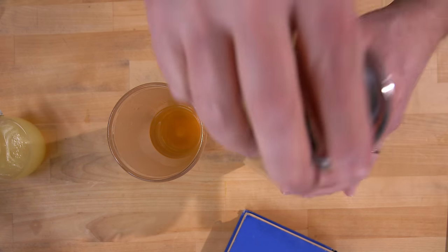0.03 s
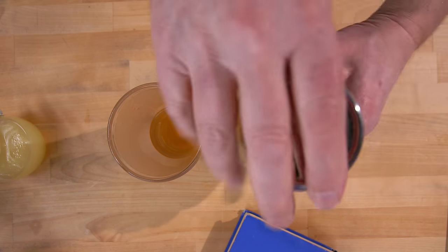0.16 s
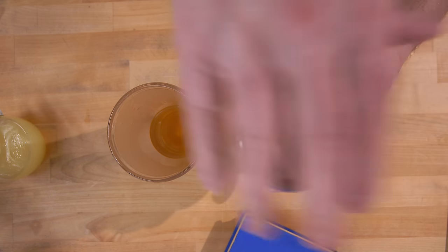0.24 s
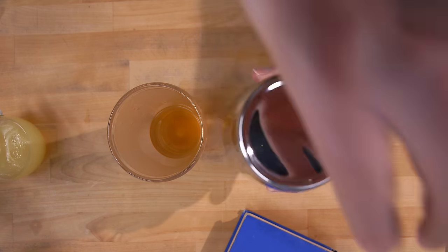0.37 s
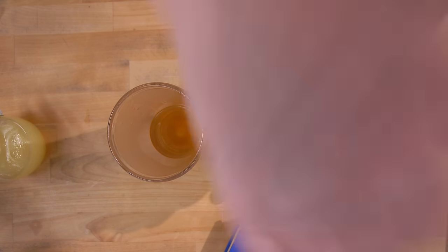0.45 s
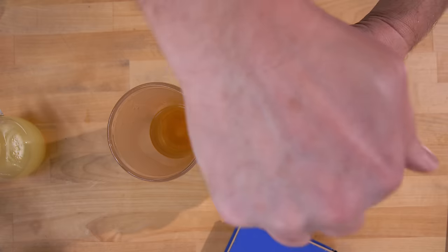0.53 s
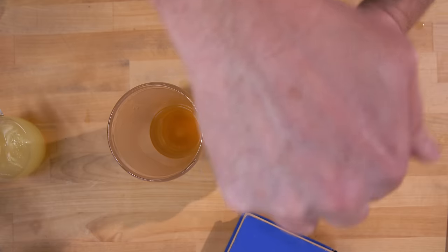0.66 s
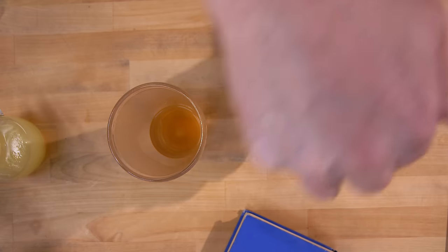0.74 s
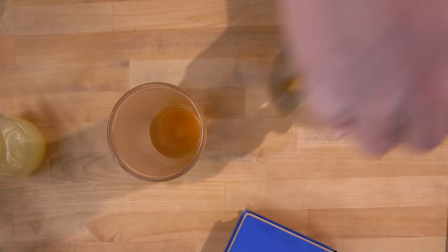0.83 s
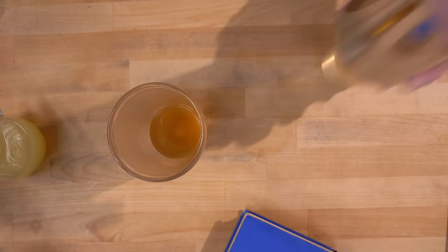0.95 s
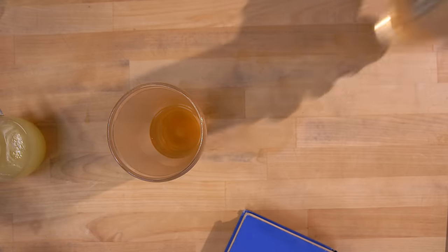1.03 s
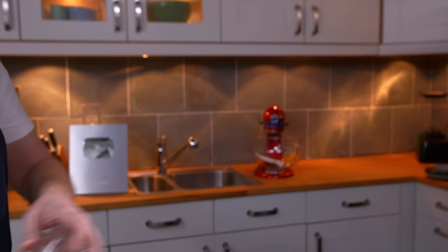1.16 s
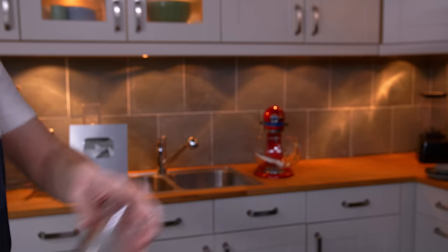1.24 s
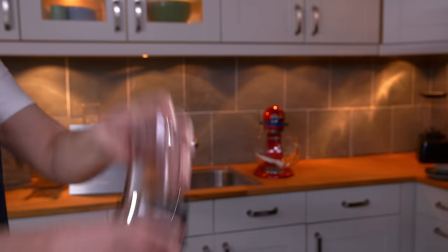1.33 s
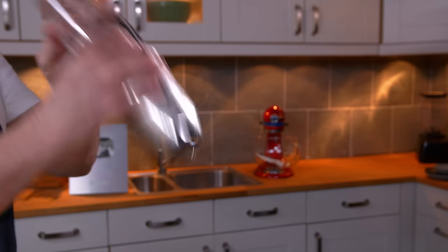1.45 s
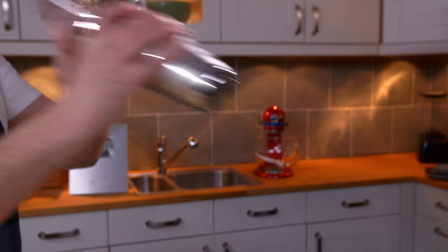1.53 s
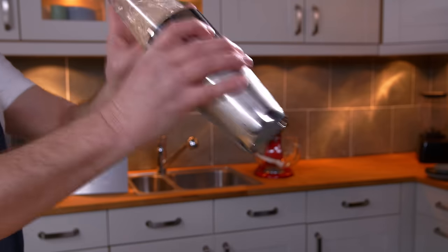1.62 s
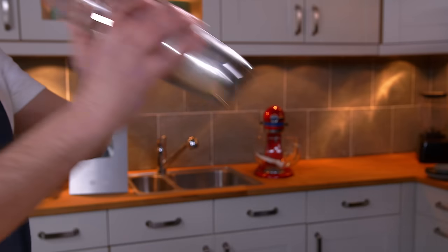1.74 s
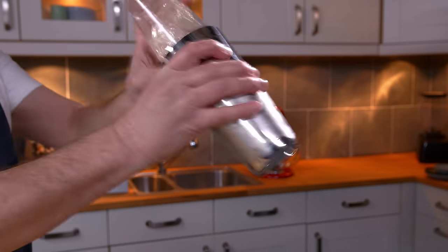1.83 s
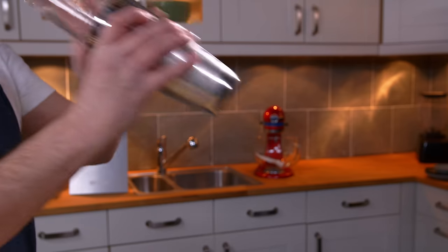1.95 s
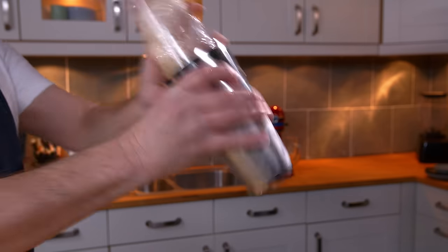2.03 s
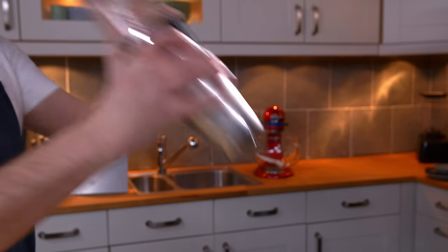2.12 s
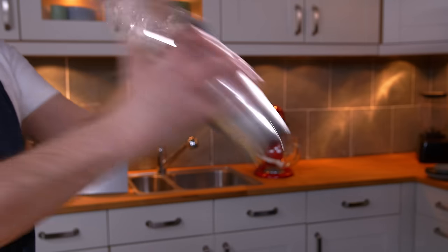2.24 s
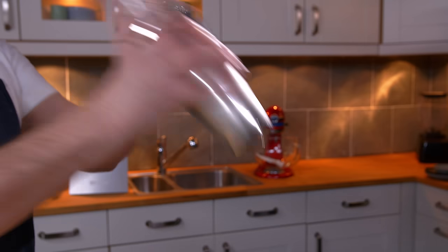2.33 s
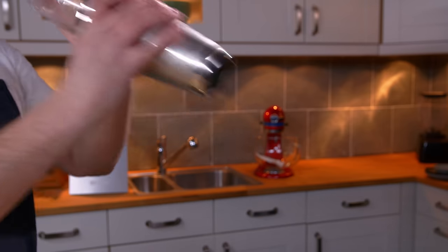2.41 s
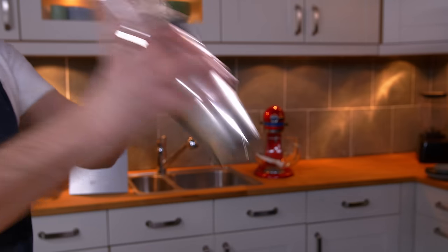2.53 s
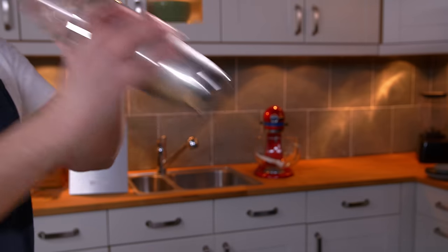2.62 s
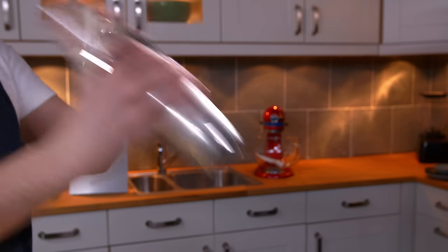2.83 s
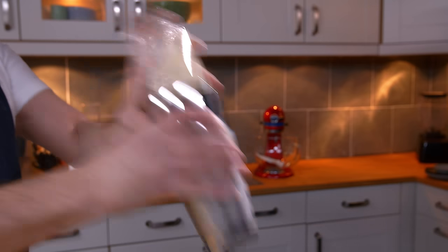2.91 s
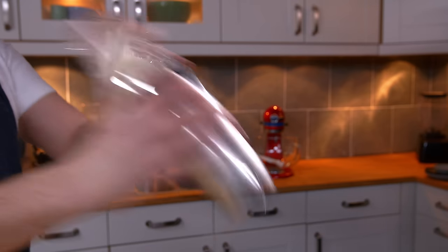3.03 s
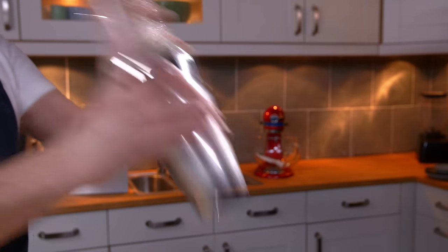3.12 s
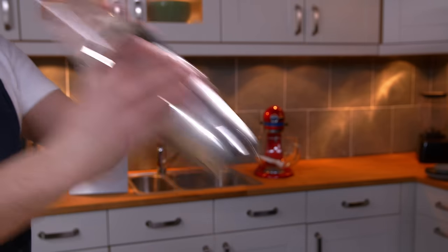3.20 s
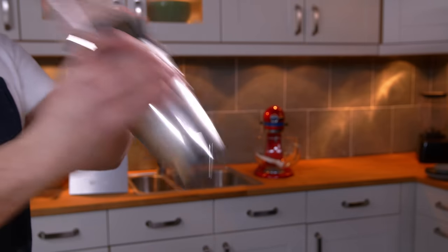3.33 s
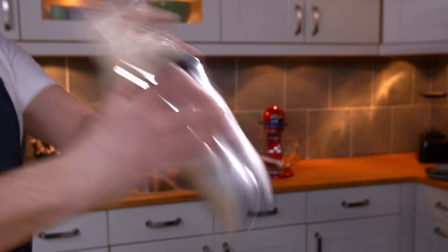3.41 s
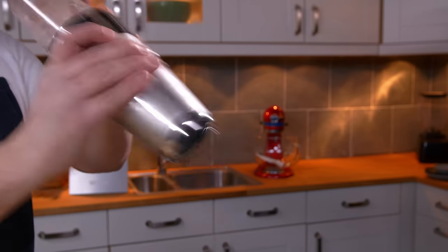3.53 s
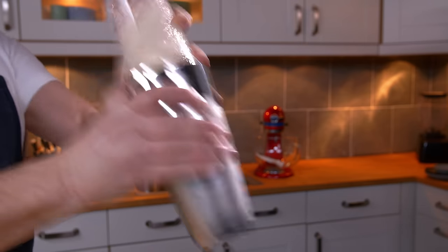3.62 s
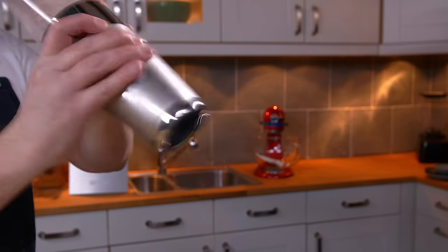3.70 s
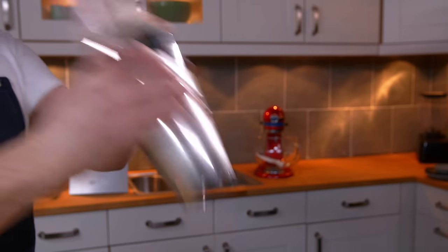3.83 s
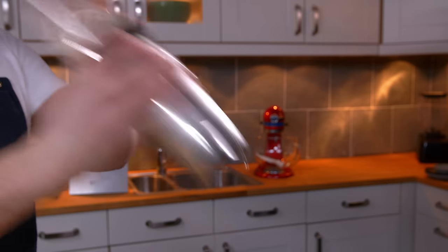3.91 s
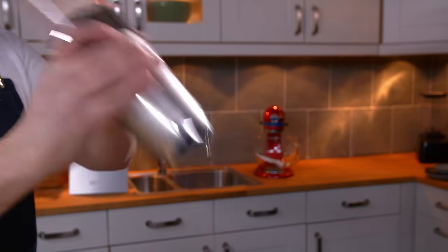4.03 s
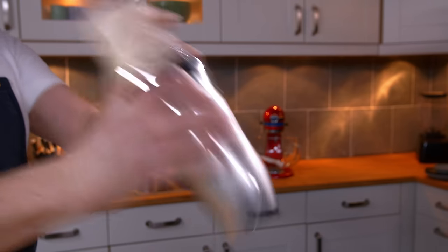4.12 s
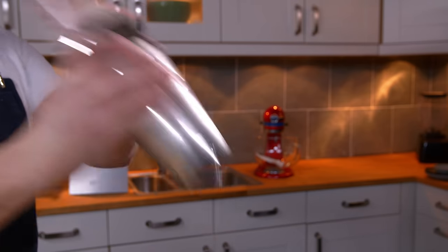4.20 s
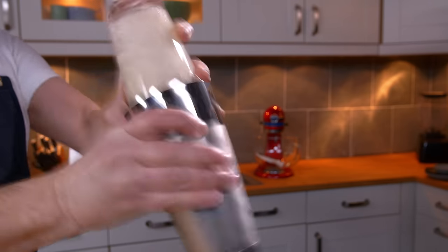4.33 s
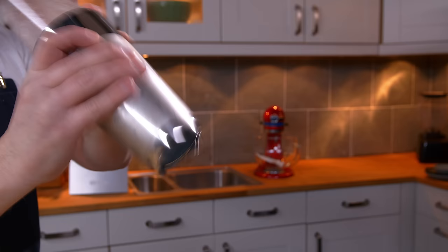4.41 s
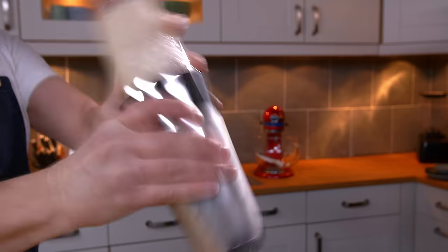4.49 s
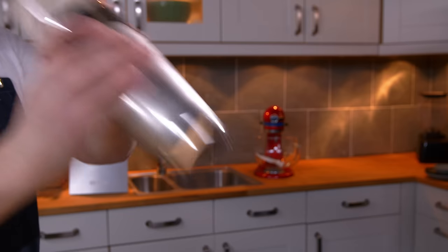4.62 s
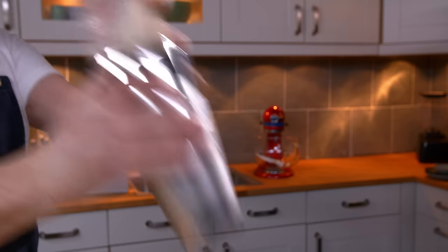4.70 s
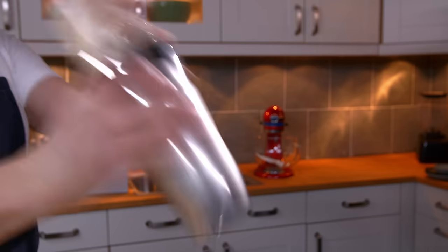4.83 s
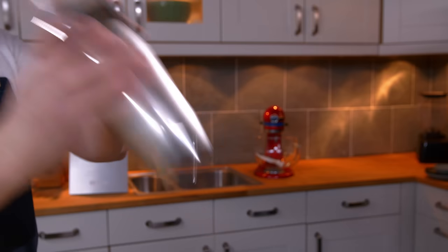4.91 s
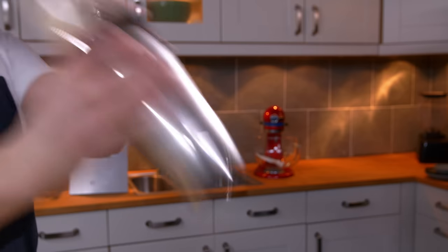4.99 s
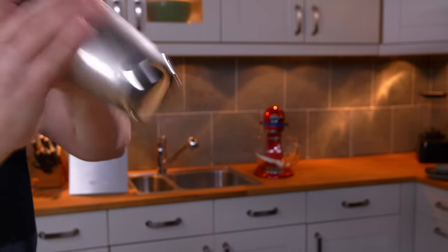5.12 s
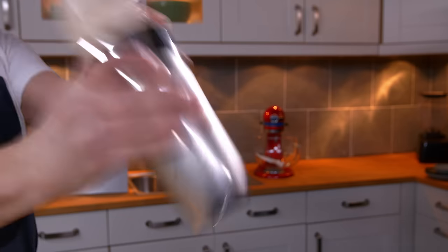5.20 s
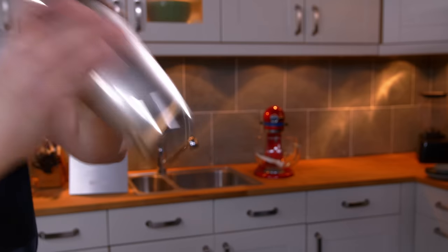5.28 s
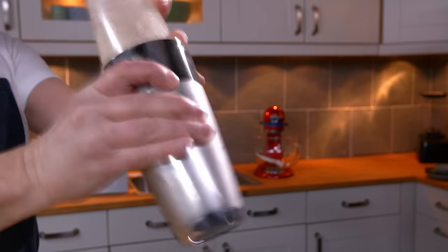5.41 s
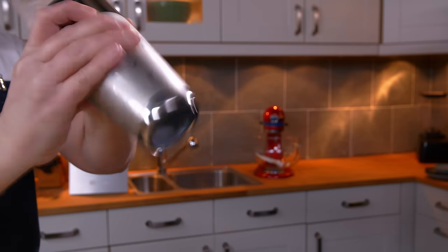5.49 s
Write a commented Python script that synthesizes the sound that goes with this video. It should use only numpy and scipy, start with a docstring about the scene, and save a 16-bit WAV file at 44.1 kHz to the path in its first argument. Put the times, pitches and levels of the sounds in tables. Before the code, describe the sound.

After a short thud and clink on a wooden counter, ice and drink are shaken vigorously in a steel shaker, clattering and splashing.

```python
"""A kitchen, at a wooden counter. A glass is pressed and slapped into a steel shaker can: the counter
thuds, the glass rings, ice clatters. The can is lifted; the counter rumbles on, ice settles and a thin
tone swells and fades. After a brief silence comes a second scene, the shaking: cubes knock the wall
and base of the hand-damped can, small pieces rattle, and the drink splashes and sloshes."""
import sys
import numpy as np
from scipy import signal
from scipy.fft import rfft, irfft, next_fast_len
from scipy.io import wavfile

SR = 44100
rng = np.random.default_rng(int(sys.argv[2]) if len(sys.argv) > 2 else 0)


def file_out(sig):
    """Save sig as 16-bit WAV at sys.argv[1]."""
    # one column per channel
    cols = np.atleast_2d(sig).T
    # limit, then scale
    lim = np.clip(cols, -1, 1)
    pcm = np.round(lim * 32767).astype(np.int16)
    wavfile.write(sys.argv[1], SR, pcm)


N = 244755
PAUSE_START_S, PAUSE_END_S = 1.158, 1.193


def gain_of(db):
    return 10 ** (np.asarray(db) / 20)


def unit_rms(x):
    return x / np.sqrt(np.mean(x ** 2) + 1e-20)


def unit_peak(x):
    return x / (abs(x).max() + 1e-12)


def at_hz(points, hz):
    f, value = np.transpose(points)
    return np.interp(np.log(hz + 1), np.log(f + 1), value)


def curves(segments):
    """Gate over the table's time span, then each column per sample."""
    s, *columns = np.transpose(sorted(sum(segments, []), key=lambda row: row[0]))
    t = np.arange(N) / SR
    gate = np.clip(np.minimum(t - s[0], s[-1] - t) / 0.0066, 0, 1)
    return gate, *(np.interp(t, s, c) for c in columns)


def add(mix, start_s, sound):
    part = mix[round(start_s * SR):][:len(sound)]
    part += sound[:len(part)]


def coloured(x, spectrum):
    """Spectral shaping, rms 1."""
    size = next_fast_len(len(x))
    gain = gain_of(at_hz(spectrum, np.fft.rfftfreq(size, 1 / SR)))
    return unit_rms(irfft(rfft(x, size) * gain, size)[:len(x)])


def resonate(x, hz, *widths_hz):
    """Unity-gain resonators in series, one per width."""
    for width_hz in widths_hz:
        r = np.exp(-np.pi * width_hz / SR)
        x = 2 * signal.lfilter([1 - r], [1, -r * np.exp(2j * np.pi * hz / SR)], x).real
    return x


def swell(rise_s, count):
    """Fast rise to 1, slower fall."""
    u = np.arange(count) / SR / max(rise_s, 1e-4)
    return u * np.exp(1 - u)


def decay(t60_s, count):
    return gain_of(-60 * np.arange(count) / SR / t60_s)


def flicker(step_s, spread_db):
    """Randomly wandering gain."""
    steps = rng.standard_normal(int(N / SR / step_s) + 2)
    return gain_of(spread_db * np.interp(np.arange(N) / SR / step_s, np.arange(len(steps)), steps))


def struck(modes, push):
    """Modes rung by one push; the spot hit sets each one's strength and sign."""
    t = np.arange(SR // 2) / SR
    spots = rng.uniform(-1.07, 1, (len(modes), 2))
    ring = sum(np.sign(side) * gain_of(db + 2 * strength - 60 * t / t60_s) * np.sin(2 * np.pi * hz * t)
               for (hz, db, t60_s), (strength, side) in zip(modes, spots))
    return unit_peak(signal.fftconvolve(ring, push)[:len(t)])


# Room noise: (frequency [Hz], relative density [dB])
ROOM_SPECTRUM = [(18, -34), (30, -4), (59, -18.5), (86, -36.5), (149, 4.5), (174, 4), (319, 3), (666, -8.5),
                 (2540, -14), (4080, -17.5), (16000, -27)]


def room_tone(level_db=-72.5):
    """Faint, steady, low noise."""
    return gain_of(level_db) * coloured(rng.standard_normal(N), ROOM_SPECTRUM)


# Kitchen decay: (frequency [Hz], t60 [s])
KITCHEN_T60 = [(150, 0.35), (1000, 0.084), (4000, 0.12), (12000, 0.14)]


def kitchen_reverb(x):
    """Sparse reflections of random sign; each band decays at its own rate."""
    taps = np.zeros(SR // 2)
    slots = np.arange(200, SR // 2 - 20, 20)
    taps[slots + rng.integers(0, 20, len(slots))] = rng.choice([-1., 1.], len(slots))
    hz, t, bands = signal.stft(taps, SR, nperseg=256)
    tail = signal.istft(bands * gain_of(-60 * t / at_hz(KITCHEN_T60, hz)[:, None]), SR, nperseg=256)[1]
    return signal.fftconvolve(x, tail / np.linalg.norm(tail))[:N]


# Tone contour: (time [s], pitch [Hz], level [dB])
TONE_CONTOUR = [(0.6, 1752, -63), (0.632, 1750, -68), (0.684, 1750, -63), (0.78, 1751, -66),
                (0.906, 1747, -85), (0.92, 1749, -101)]
# Tone partials: (pitch [ratio], gain [dB])
TONE_PARTIALS = [(1, 0), (1.185, -13), (1.221, -13), (1.532, -11)]


def thin_tone(onset_s=0.053):
    """A thin tone swells and fades with three fainter ones above it."""
    gate, hz, level_db = curves([TONE_CONTOUR])
    cycles = np.cumsum(hz) / SR
    gate *= np.minimum(np.cumsum(gate) / SR / onset_s, 1)
    partials = sum(gain_of(db) * flicker(.02, 1.7) * np.sin(2 * np.pi * ratio * cycles)
                   for ratio, db in TONE_PARTIALS)
    return gate * np.sqrt(2) * gain_of(level_db) * partials


# Ice ticks: (time [s], peak [dB], pitch [Hz])
ICE_TICKS = [(0.1994, -59, 2420), (0.2464, -66, 2820), (0.2724, -61, 2510), (0.2894, -65, 2480),
             (0.6394, -57, 2670), (0.6714, -64, 2140), (0.748, -55, 2580), (0.7927, -51, 2630),
             (0.807, -56, 2500), (0.8374, -58, 2480), (0.8649, -59.5, 3040), (0.8974, -67, 3250),
             (0.9293, -54.5, 2940), (0.9634, -63, 6900), (0.9744, -63, 4710), (1.02, -65, 3070),
             (1.0654, -62, 2930)]


def settling_ice():
    """Ice settles in the lifted can with small pitched snaps."""
    out = np.zeros(N)
    for s, peak_db, hz in ICE_TICKS:
        snap = swell(0.0011, count=800) * rng.standard_normal(800)
        add(out, s, gain_of(peak_db) * (unit_peak(resonate(snap, hz, 350)) + 0.079 * snap))
    return out


# Counter rumble, in segments: (time [s], relative level [dB], centre [Hz])
RUMBLE_CONTOUR = [
    [(0.54, -28.5, 169), (0.596, -41, 204), (0.636, -47, 176), (0.66, -53, 165), (0.674, -53, 167),
     (0.766, -55, 196), (0.78, -58, 189)],
    [(0.78, -56, 176), (0.824, -58, 189), (0.862, -61.5, 262), (0.91, -62.5, 258), (0.958, -76, 220),
     (0.97, -65.5, 208), (1.0, -80, 228)],
]
# Wooden counter: (frequency [Hz], gain [dB], nominal t60 [s])
COUNTER_MODES = [(63, -12, .4), (98, -5.5, .15), (127, 0.5, .2), (156.4, -7, 0.28), (217, -1.5, 0.12),
                 (267, -11, 0.1), (288.5, 2.5, 0.11), (327, -7.5, 0.083), (367, -8.5, 0.091), (426, 5, .08),
                 (533, -5, 0.19), (610, 0, 0.079), (743, 1, 0.066), (860, 5, 0.066), (1023, 0.5, .07),
                 (1240, -14, .07)]


def counter_modes(centre_hz, slope_db_per_octave=14.2):
    """Counter modes near the excited pitch ring most."""
    return [(hz, db - slope_db_per_octave * abs(np.log2(hz / centre_hz)), t60_s)
            for hz, db, t60_s in COUNTER_MODES]


def counter_rumble():
    """The counter's lower modes rumble on while the can is lifted."""
    gate, level_db, centre_hz = curves(RUMBLE_CONTOUR)
    noise = rng.standard_normal(N)
    rumble = sum(gain_of(db) * unit_rms(resonate(noise, hz, 30))
                 for hz, db, _ in counter_modes(centre_hz)[:12])
    return gate * gain_of(level_db - 7.5) * rumble


# Glass: (frequency [Hz], gain [dB], undamped t60 [s])
GLASS_MODES = [(1497, -12, .06), (1846, -10, .05), (2293, -12, .04), (2580, -15, .1), (2720, -16, .12),
               (2955, 0, .13), (3020, -6, .11), (4010, -14, .07), (4538, -2, .12), (4610, -8, .08),
               (5378, -10, .05), (7235, -16, .06)]
# Clatter: (frequency [Hz], relative density [dB])
CLATTER_SPECTRUM = [(300, -11.5), (1000, -1.5), (2700, -4), (5000, -8), (9000, -11.5), (16000, -18.5)]
# Blows: (time [s], thud [dB], spot pitch [Hz], glass ring [dB], hand damping [t60 factor],
# relative clatter [dB], contact [s])
CLOSING_BLOWS = [(.0045, -32, 300, -26, 0.88, -20, .002), (0.091, -48, 300, -52, 0.27, -41, .003),
                 (0.097, -48, 300, -30, 0.34, -34, .002), (0.104, -49, 150, -49, 0.48, -34, .002),
                 (0.1105, -44, 150, -33, 0.17, -34, .0015), (0.119, -34.5, 283, -53, 0.41, -46, .0015),
                 (0.17, -51.5, 150, -52, .4, -54, .003), (0.504, -15, 718, -40, .3, -18.5, .0015),
                 (0.513, -17.5, 170, -45.5, .3, -31, .003), (.523, -24, 600, -33.5, .3, -38, .002),
                 (0.53, -23, 500, -45, .3, -37, .003), (0.542, -27, 600, -45, 0.27, -54, .004),
                 (0.57, -40, 500, -48, .3, -55, .005), (0.587, -42, 202, -41, 0.27, -50, .003),
                 (0.615, -53, 200, -50, .3, -68, .004)]


def closing_blows():
    """Each blow thuds in the counter, rings the glass and clatters briefly."""
    out = np.zeros(N)
    noise = coloured(rng.standard_normal(N), CLATTER_SPECTRUM)
    push = np.diff(swell(0.00021, count=400))
    loose_ice = 0.046 * decay(0.27, count=6000)
    for s, thud_db, spot_hz, ring_db, damping, clatter_db, contact_s in CLOSING_BLOWS:
        counter = [(hz, db, t60_s * (0.18 + .6 * damping)) for hz, db, t60_s in counter_modes(spot_hz)]
        glass = [(hz, db, t60_s * damping) for hz, db, t60_s in GLASS_MODES]
        clatter = (swell(contact_s, count=6000) + loose_ice) * noise[round(s * SR):][:6000]
        add(out, s, gain_of(thud_db) * struck(counter, push))
        add(out, s, gain_of(ring_db) * struck(glass, np.ones(1)))
        add(out, s, gain_of(clatter_db - 7.5) * clatter)
    return out


# Slosh: (frequency [Hz], relative density [dB])
SLOSH_SPECTRUM = [(24, -60), (40, -51), (205, -17.5), (367, -13), (473, -4), (706, -6), (1100, -4),
                  (1400, 2), (1820, -44), (3080, -120)]


def slosh(crackle):
    """The drink's low, uneven surge."""
    return coloured(flicker(.012, 6.0) * rng.standard_normal(N) + 1.02 * crackle, SLOSH_SPECTRUM)


# Splash and ice crack: (frequency [Hz], relative density [dB])
SPLASH_SPECTRUM = [(2530, -33), (4300, 0.5), (5950, -4.5), (8050, -2), (9230, -1), (10100, -6),
                   (12800, -3.5), (15100, -8), (16000, -2.5)]


def splash(crackle, churn):
    """The drink's bright hiss, shifting in colour."""
    hiss = coloured(1.04 * crackle + churn, SPLASH_SPECTRUM)
    bands = sum(flicker(0.017, 4.9) * resonate(hiss, hz, 0.32 * hz) for hz in (5060, 6650, 9970, 12950))
    return unit_rms(.5 * hiss + bands)


# Hand-held can base: (frequency [Hz], width [Hz], gain [dB])
BASE_MODES = [(1550, 143, 4), (1960, 233, 5), (2720, 270, -4)]


def can_rattle(hits, spots, drive, rattle_db, wall_hz=3450, width_hz=195):
    """Small pieces ring wall and base; gentle motion excites the wall less."""
    wall = sum(resonate(hits * (spots == k), wall_hz * ratio, width_hz, 2 * width_hz)
               for k, ratio in enumerate(np.linspace(.9, 1.12, num=8)))
    base_drive = .5 * unit_rms(hits) + drive
    base = sum((-1) ** k * gain_of(db) * resonate(base_drive, hz, 1.53 * width, 1.53 * width)
               for k, (hz, width, db) in enumerate(BASE_MODES))
    broad = resonate(drive, 3270, 2400, 2420)
    wall_db = -7.5 + 0.11 * (rattle_db + 43)
    return gain_of(wall_db) * unit_rms(wall) + gain_of(-4) * (unit_rms(base) + unit_rms(broad))


# Shaking, in segments, relative levels: (time [s], rattle [dB], slosh [dB], splash [dB])
SHAKE_LEVELS = [
    [(1.195, -58, -86, -51), (1.229, -59.5, -69, -63), (1.265, -64, -86, -68.5), (1.323, -63, -82, -64),
     (1.34, -61, -83, -66)],
    [(1.34, -54, -66, -51), (1.4, -61, -79, -58), (1.412, -56, -66, -61), (1.424, -56, -79, -61),
     (1.502, -60, -73, -77), (1.511, -54, -57, -60)],
    [(1.511, -49, -60, -53), (1.517, -39, -51, -45), (1.535, -47, -64, -65), (1.543, -38, -52, -45)],
    [(1.543, -42, -56, -34.5), (1.589, -23.5, -56, -24.5), (1.659, -35, -56, -35), (1.679, -25, -40, -29),
     (1.695, -25, -46, -26.5), (1.763, -42, -56, -42.5)],
    [(1.763, -43, -54, -50), (1.805, -29, -54, -29.5), (1.861, -41, -63, -44.5), (1.899, -25, -44, -29.5),
     (1.977, -42.5, -58, -52), (1.984, -34, -52, -43)],
    [(1.984, -43, -53, -38), (2.01, -28.5, -43.5, -34), (2.1, -30, -51, -37), (2.14, -28, -40.5, -27),
     (2.204, -44, -59, -53), (2.246, -31.5, -53, -33.5), (2.374, -30.5, -43, -35.5), (2.424, -47, -66, -53),
     (2.433, -40, -51, -44)],
    [(2.433, -40, -55, -40.5), (2.465, -29, -49.5, -29.5), (2.587, -27.5, -45.5, -33.5),
     (2.615, -39, -60, -50), (2.653, -25, -50, -24.5), (2.729, -26, -37, -37), (2.777, -29, -43.5, -27.5),
     (2.838, -35, -55, -39)],
    [(2.838, -35, -52, -30), (2.904, -23.5, -41.5, -31.5), (2.928, -31.5, -47.5, -39),
     (2.982, -28, -40.5, -29), (3.016, -38, -54, -45), (3.04, -32, -57, -30.5), (3.162, -26.5, -34, -32),
     (3.205, -37, -54, -44.5)],
    [(3.205, -31, -51, -34.5), (3.347, -30.5, -45.5, -32.5), (3.389, -39, -59, -47.5),
     (3.399, -28.5, -48, -33.5), (3.479, -35, -48.5, -39), (3.499, -24.5, -39, -28.5),
     (3.553, -43, -60, -45), (3.56, -35, -54, -37)],
    [(3.56, -39, -53.5, -35), (3.668, -26.5, -40.5, -35), (3.734, -35.5, -54, -38.5),
     (3.788, -28, -42, -30), (3.81, -30.5, -52, -37.5), (3.858, -26.5, -40, -30), (3.892, -36, -50, -42),
     (3.95, -27, -43, -30), (4.035, -32.5, -54, -39)],
    [(4.035, -29, -49, -34), (4.055, -27, -40, -35), (4.077, -33.5, -51.5, -35), (4.241, -29, -43, -36),
     (4.257, -35, -55, -43), (4.271, -33.5, -49, -34), (4.407, -26, -43, -32.5), (4.449, -40.5, -56, -43),
     (4.455, -42, -51, -42)],
    [(4.455, -33, -49, -37), (4.467, -37.5, -56, -34.5), (4.497, -25.5, -48, -30.5),
     (4.553, -34, -48.5, -37.5), (4.597, -26.5, -46, -30), (4.631, -32.5, -58, -36),
     (4.757, -32, -43.5, -34.5), (4.79, -32, -65, -37)],
    [(4.79, -48, -56, -43), (4.804, -35, -52, -32), (4.922, -30, -47.5, -38), (4.968, -36.5, -50, -37),
     (5.01, -33, -53.5, -35), (5.132, -29.5, -46.5, -34), (5.176, -45, -58, -48), (5.19, -34, -49, -30)],
    [(5.19, -29, -49, -33), (5.234, -31, -57, -37.5), (5.306, -28, -49, -35), (5.35, -44, -59, -49),
     (5.364, -31, -50, -35), (5.46, -31.5, -49.5, -38), (5.474, -27.5, -39.5, -36), (5.55, -43.5, -63, -47)],
]


def shaken_contents(hits_per_s=600):
    """Small ice and drink move together; each cube knock adds brief chatter and spray."""
    _, rattle_db, slosh_db, splash_db = curves(SHAKE_LEVELS)
    sizes = gain_of(3.8 * np.minimum(rng.exponential(1, N), 4)) * rng.choice([-1, 1], N)
    hits = sizes * (rng.random(N) < hits_per_s / SR)
    spots = rng.integers(0, 8, N)
    churn = unit_rms(flicker(.004, 3.2) * rng.standard_normal(N))  # dense bubbles and chips
    puffs = signal.oaconvolve(abs(hits), swell(.0008, count=500))[:N]
    crackle = unit_rms(puffs * rng.standard_normal(N))
    chatter, spray, fade = np.zeros(N), np.zeros(N), decay(0.053, count=3000)
    for s, wall_db, _, base_db, _, _, crack_db in CUBE_KNOCKS:
        add(chatter, s, gain_of(max(wall_db, base_db) - 26) * fade)
        add(spray, s, gain_of(crack_db - 21.5) * fade)
    out = (gain_of(rattle_db - 3.5) + chatter) * can_rattle(hits, spots, 0.69 * crackle + churn, rattle_db)
    out += (gain_of(splash_db) + spray) * splash(crackle, churn)
    out += gain_of(slosh_db + 0.65) * slosh(crackle)
    return out * (np.arange(N) > PAUSE_END_S * SR)


# Cube impacts, relative levels: (peak time [s], wall [dB], wall pitch [Hz], base [dB],
# base pitch [Hz], thud [dB], crack [dB])
CUBE_KNOCKS = [(1.198, -41, 4400, -53, 1550, -70, -35), (1.2956, -49, 4440, -65, 2370, -63, -49),
               (1.3139, -47, 4200, -66, 2310, -72, -37), (1.3513, -50, 4230, -43, 1730, -64, -32),
               (1.3759, -55, 3380, -56, 1810, -71, -42), (1.3964, -54, 3800, -43, 1710, -69, -34),
               (1.519, -38, 2790, -32, 1760, -55, -32), (1.5254, -38, 3050, -32, 1830, -68, -44),
               (1.5616, -25.5, 3300, -37, 1920, -54, -24), (1.5814, -11.5, 3300, -14, 1880, -46, -27),
               (1.5862, -14, 3190, -13, 1720, -30, -9), (1.6093, -9, 3520, -28, 2260, -32, -21),
               (1.6177, -12, 3550, -16, 1890, -43, -26), (1.6339, -19, 3680, -38, 1980, -53, -32),
               (1.6816, -24, 3300, -24, 1500, -44, -24), (1.708, -21, 3250, -18, 1910, -39, -20),
               (1.7664, -38, 3260, -24, 1860, -32.5, -17), (1.7787, -35, 3400, -26, 1820, -49, -28),
               (1.8024, -23, 3330, -23, 1910, -48, -27), (1.8099, -11, 3440, -19, 1960, -37, -28),
               (1.843, -19, 3460, -23, 1930, -61, -19), (1.866, -28, 3380, -31, 2130, -60, -30),
               (1.8936, -25, 3570, -22, 2360, -61, -16.5), (1.9387, -32, 2720, -22, 1980, -49, -39),
               (1.9462, -31, 2850, -34, 1950, -60, -44), (1.9567, -44, 2740, -40, 1530, -56, -45),
               (1.9867, -46, 4060, -24, 1570, -35, -33), (1.9911, -40, 3570, -22, 1930, -36, -27),
               (2.0013, -32, 2550, -18, 1600, -28, -27), (2.0127, -13, 3460, -20, 1960, -35, -12.5),
               (2.0185, -24, 2570, -23, 1550, -36, -23), (2.0269, -21, 3580, -18, 2170, -24.5, -27),
               (2.0618, -20, 3850, -22, 1540, -43, -23), (2.0828, -20.5, 3350, -20, 1910, -42, -33),
               (2.1284, -24, 4130, -14, 1920, -52, -20), (2.1549, -34, 3560, -15.5, 1980, -32, -33),
               (2.2205, -34, 4200, -35, 2140, -31.5, -22.5), (2.2285, -23, 3350, -35, 1500, -43, -36),
               (2.2485, -16, 3360, -43, 1960, -37, -29), (2.2528, -7, 3430, -17, 2020, -38, -17),
               (2.2743, -17, 3330, -18, 1920, -40, -25), (2.2791, -16.5, 3680, -15, 1980, -42, -38),
               (2.2881, -16, 3780, -21, 2010, -49, -35), (2.312, -24, 3400, -7, 2020, -45, -26),
               (2.3582, -24, 3620, -19, 1710, -25.5, -22), (2.3882, -33, 3530, -21.5, 1980, -44, -35),
               (2.437, -37, 2960, -40, 1550, -39, -36), (2.4493, -33, 3320, -36, 1840, -41, -23),
               (2.4641, -21, 3500, -31, 1490, -36, -24), (2.4763, -12.5, 3390, -23, 1690, -36, -12),
               (2.5351, -19, 3340, -36, 2130, -46, -26), (2.5462, -18.5, 3660, -24, 1720, -51, -20),
               (2.5674, -32, 3030, -18, 1870, -35, -23), (2.6347, -38, 3300, -23, 1960, -47, -33),
               (2.645, -22, 3460, -36, 2400, -51, -23), (2.654, -40, 2750, -18.5, 1550, -34, -22),
               (2.6829, -23, 3300, -13, 1850, -40, -12.5), (2.7175, -17, 3450, -19, 2100, -27, -47),
               (2.7272, -23, 2540, -14, 2040, -27, -41), (2.768, -26, 2730, -17, 1290, -29, -19),
               (2.8173, -24, 2720, -16, 2080, -53, -37), (2.843, -12.5, 3370, -19.5, 1630, -38, -24),
               (2.851, -22, 3500, -26, 1500, -50, -13), (2.8802, -16, 3380, -17, 2400, -36, -18),
               (2.8983, -16, 3400, -13, 2000, -36, -28), (2.9059, -18, 3380, -17, 2200, -26.5, -45),
               (2.9358, -24, 3380, -19, 2120, -50, -29), (2.985, -23, 3600, -21, 1550, -44, -17.5),
               (3.0275, -39, 3310, -43, 1900, -43, -33), (3.0373, -22, 3370, -24, 1780, -40, -28),
               (3.045, -17, 3370, -30, 1870, -50, -15.5), (3.0761, -15, 3560, -24, 1350, -35, -18),
               (3.0978, -19, 3480, -19, 2200, -35, -37), (3.114, -17.5, 3380, -29, 1870, -44, -41),
               (3.119, -20, 3420, -21, 2350, -43, -38), (3.1356, -31, 3340, -18, 2040, -33, -17),
               (3.2089, -25, 3280, -21, 1600, -41, -25), (3.2286, -24, 3500, -19.5, 1650, -37, -23.5),
               (3.298, -20, 3670, -41, 2000, -54, -36), (3.3416, -21, 3530, -24, 1840, -29.5, -25),
               (3.3675, -26, 3300, -39, 2230, -54, -46), (3.3996, -31, 3000, -36, 2210, -34, -20.5),
               (3.4114, -32, 3570, -25, 1550, -31, -16), (3.4453, -22, 3200, -29, 1940, -48, -27),
               (3.45, -20, 2500, -12, 1940, -22.5, -27), (3.472, -21.5, 3450, -21, 2230, -57, -32),
               (3.5004, -21, 3250, -23, 2420, -40, -18), (3.5251, -19, 3520, -26, 2140, -37, -32),
               (3.564, -31, 4200, -29, 1440, -39, -34), (3.5813, -19, 3400, -20, 1560, -45, -19),
               (3.586, -21, 3520, -34, 1750, -35, -19), (3.6218, -14.5, 3520, -13.5, 2020, -31, -21.5),
               (3.6589, -28, 3160, -15.5, 2020, -31.5, -40), (3.6644, -20, 3190, -18, 2430, -40.5, -20.5),
               (3.751, -17, 4120, -32, 2170, -46, -18), (3.7765, -34, 2700, -15, 1550, -25, -36),
               (3.7857, -23, 3440, -13, 1920, -25.5, -26), (3.8045, -21, 3600, -22, 1820, -46, -25),
               (3.826, -22, 3380, -33, 1600, -47, -27), (3.8608, -29, 4050, -13, 1960, -35, -22),
               (3.9013, -37, 3500, -24, 1590, -36, -36), (3.9185, -24, 3390, -28, 2140, -34, -25),
               (3.946, -19.5, 3450, -33.5, 1580, -48, -31), (3.9506, -15, 3520, -22, 2360, -43, -32),
               (3.9699, -17, 3670, -17, 1960, -45, -24), (3.9848, -20, 3500, -20, 2140, -47, -35),
               (4.0433, -21, 4110, -22.5, 1480, -44, -22), (4.054, -20, 3410, -31, 1790, -28, -31),
               (4.111, -36, 2940, -17.5, 1570, -49, -37), (4.14, -20, 3500, -25, 1590, -31, -19),
               (4.1447, -20, 3570, -40, 2000, -40, -23), (4.1646, -19.5, 3450, -44, 1570, -56, -40),
               (4.2217, -25, 3170, -19, 1860, -34, -28), (4.2359, -21, 3400, -20, 2120, -39, -28),
               (4.268, -29, 3100, -16, 1560, -35, -20), (4.298, -14.5, 3600, -26, 1950, -51, -18),
               (4.3296, -19, 2720, -19, 2160, -28, -23), (4.3448, -25, 3650, -18.5, 1950, -40, -41),
               (4.3531, -14, 3500, -19, 2150, -40, -36), (4.459, -26, 3410, -30, 1540, -35, -32),
               (4.4623, -36, 2970, -30, 1780, -49, -22), (4.489, -20, 3740, -40, 1830, -47, -25),
               (4.498, -21, 3500, -40, 1560, -34, -30), (4.5241, -22, 3500, -17.5, 2010, -41, -40),
               (4.5656, -28, 2710, -21, 2000, -45, -32), (4.5983, -24, 2770, -31, 1660, -32, -29),
               (4.626, -15.5, 3900, -35, 1570, -55, -32), (4.6736, -10.5, 3330, -16, 2000, -36, -15.5),
               (4.6788, -29, 3580, -27, 1910, -42, -31), (4.6933, -25, 3660, -37, 2100, -55, -36),
               (4.7174, -22, 3790, -21, 2080, -38, -37), (4.7211, -17, 3730, -28, 2430, -37, -19),
               (4.7269, -12.5, 3700, -24, 2040, -38, -32), (4.7388, -17, 3700, -27, 2070, -50, -32),
               (4.7525, -19, 3670, -21, 1920, -36, -21), (4.7982, -15.5, 3700, -47, 1510, -48, -27),
               (4.8586, -22, 3460, -27, 1580, -53, -15.5), (4.8645, -9, 3680, -46, 1780, -55, -42),
               (4.8856, -27, 3270, -27, 2120, -34.5, -41), (4.9117, -19, 2700, -17.5, 1960, -45, -23),
               (4.9161, -24, 3260, -21, 1580, -28, -19), (4.983, -42, 3250, -45.5, 1570, -36, -29),
               (5.02, -22, 3450, -22, 1600, -32, -20), (5.0423, -20, 3550, -34, 1960, -46, -41),
               (5.0539, -16, 3360, -33, 2170, -47, -30), (5.0607, -19, 4000, -34, 1960, -43, -40),
               (5.1281, -19.5, 4050, -21, 1900, -38, -23), (5.1616, -30, 2530, -25, 1980, -34.5, -41),
               (5.1974, -24, 2840, -24, 1570, -47, -18), (5.2022, -23, 3500, -20, 1580, -49, -34),
               (5.229, -17.5, 3630, -34, 1980, -41, -34), (5.2413, -24, 3650, -16.5, 2080, -31, -32),
               (5.2778, -22, 3740, -19, 1560, -41, -25), (5.289, -22, 3660, -39, 1550, -37, -21),
               (5.3086, -23, 3700, -23, 2050, -54, -22), (5.3649, -34, 3430, -25, 2100, -38, -24),
               (5.376, -29, 4150, -32, 1890, -34, -30), (5.4249, -20, 3400, -32, 1730, -41, -40),
               (5.4495, -23, 3350, -18, 2090, -48, -28), (5.4671, -13.5, 3530, -34, 1900, -52, -19),
               (5.472, -15, 3520, -20, 1540, -51, -29), (5.4805, -26, 2700, -41, 1550, -24, -15.5),
               (5.504, -25, 3240, -30, 1840, -52, -41), (5.5345, -43, 4110, -47, 1730, -55, -24),
               (5.5392, -26, 3320, -44, 2140, -36, -14)]


def cube_knocks(rise_s=0.001151, count=900):
    """A cube rings the wall briefly and the base a little longer, with a thud and a crack."""
    out, t = np.zeros(N), np.arange(count) / SR
    noise = coloured(rng.standard_normal(N + count), SPLASH_SPECTRUM)
    pulse = swell(rise_s, count)
    for s, wall_db, wall_hz, base_db, base_hz, thud_db, crack_db in CUBE_KNOCKS:
        tuning, wall_phase, base_phase, thud_pitch, brightness = rng.random(5)
        lower_mode = np.sin(2 * np.pi * (wall_hz * (0.7 + 0.3 * tuning) * t + wall_phase))
        wall = unit_peak(pulse ** 1.88 * (np.sin(2 * np.pi * wall_hz * t) + 0.39 * lower_mode))
        base = swell(0.86 * rise_s, count) ** 1.12 * np.sin(2 * np.pi * (base_hz * t + base_phase))
        thud = pulse ** 1.6 * np.sin(2 * np.pi * (250 + 500 * thud_pitch) * t)
        burst = swell(0.66 * rise_s, count) ** 2 * noise[round(s * SR):][:count]
        cube_ring = resonate(burst, 4600 * 2.74 ** brightness, 1170)
        crack = 0.51 * burst + 1.94 * cube_ring
        can = gain_of(wall_db) * wall + gain_of(base_db - 5) * base
        add(out, s - rise_s, can + gain_of(thud_db - 4) * thud + gain_of(crack_db - 4) * crack)
    return out


def scene():
    """Closing, lifting and shaking in the kitchen; mono."""
    closing = closing_blows() + counter_rumble() + thin_tone() + settling_ice()
    low_cut = signal.butter(2, 110., "high", fs=SR, output="sos")  # a small can radiates no deep bass
    shaking = signal.sosfilt(low_cut, cube_knocks() + shaken_contents())
    room = room_tone() + gain_of(-13) * kitchen_reverb(closing) + gain_of(-14) * kitchen_reverb(shaking)
    return (room + closing + shaking)[None]


def record(dry, cutoff_hz=16000):
    """Brief silence between the two scenes, then a low-pass."""
    t = np.arange(N) / SR
    gate = np.clip(np.maximum(PAUSE_START_S - t, t - PAUSE_END_S) / 0.0022, 0, 1)
    low_pass = signal.firwin(511, cutoff_hz, window=("kaiser", 9), fs=SR)
    return signal.oaconvolve(dry * gate, low_pass[None], "same")


dry = scene()
out = record(dry)
file_out(out)
```